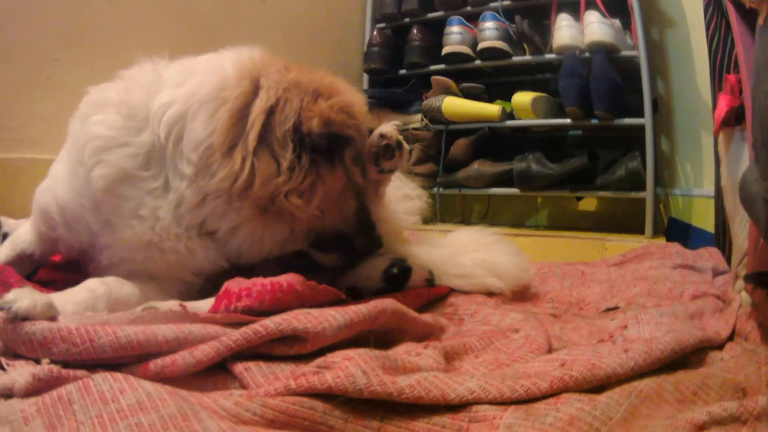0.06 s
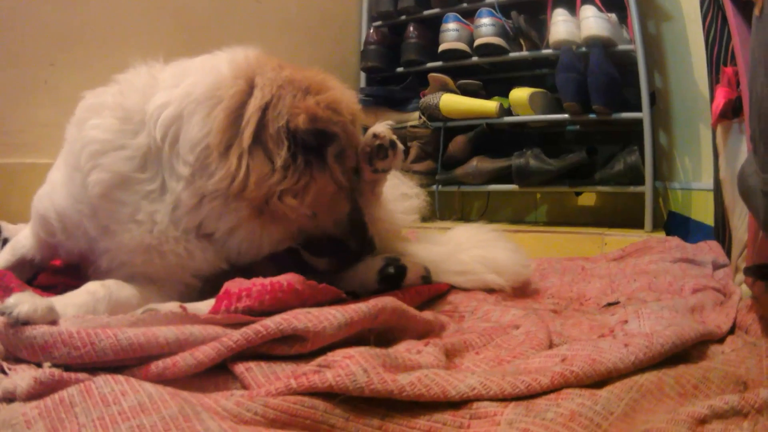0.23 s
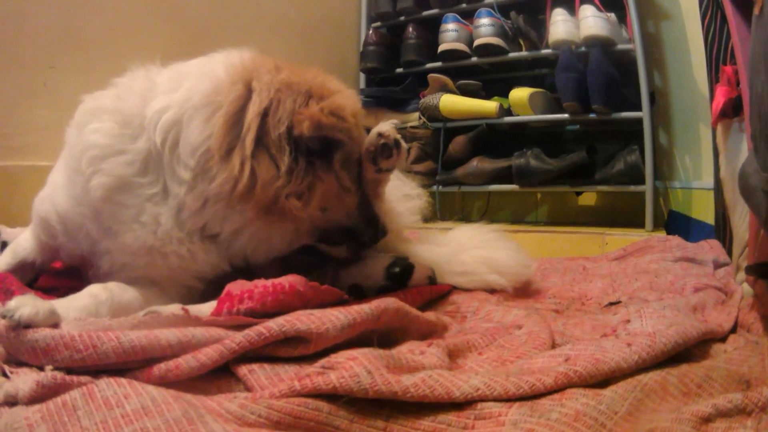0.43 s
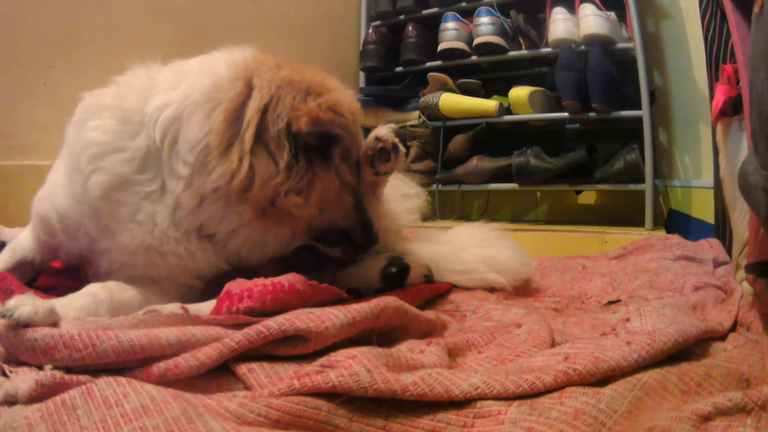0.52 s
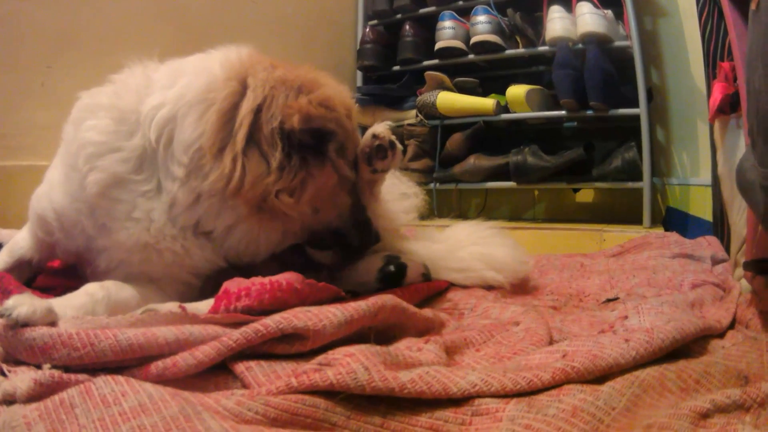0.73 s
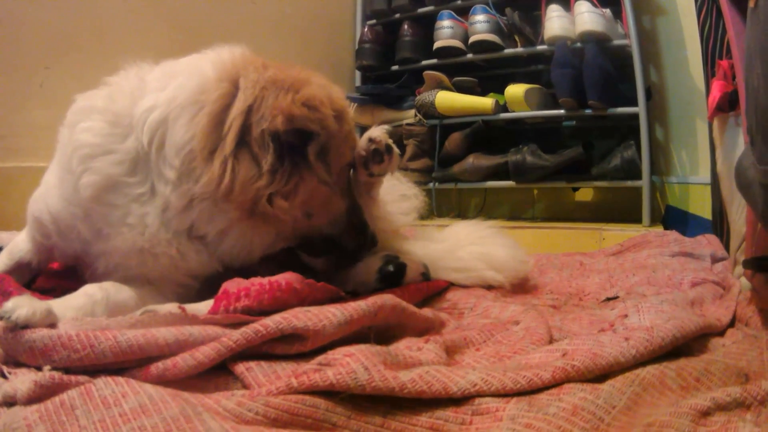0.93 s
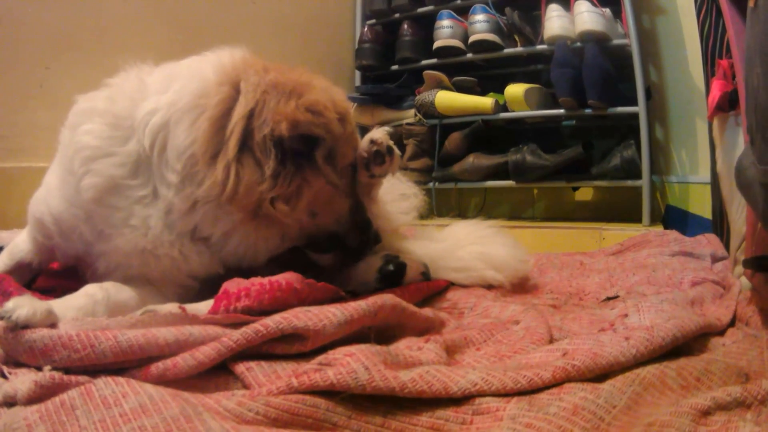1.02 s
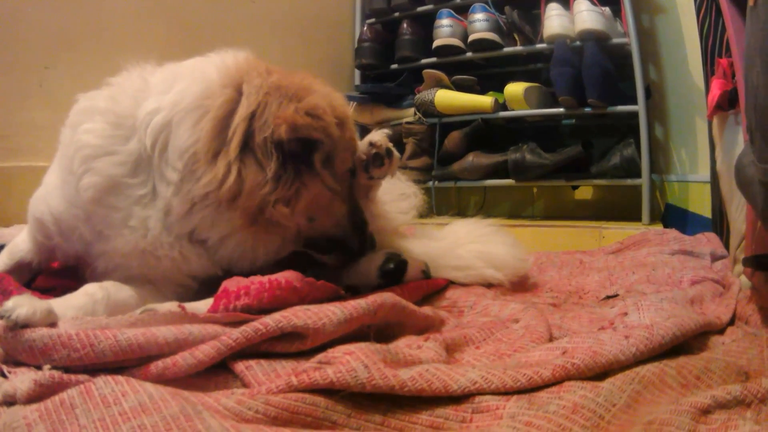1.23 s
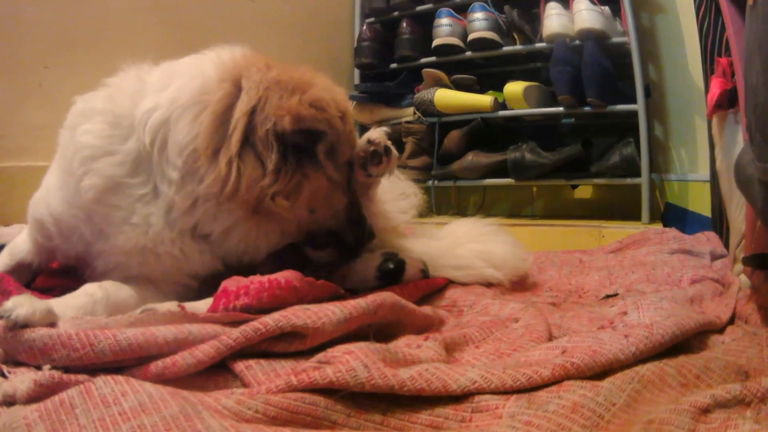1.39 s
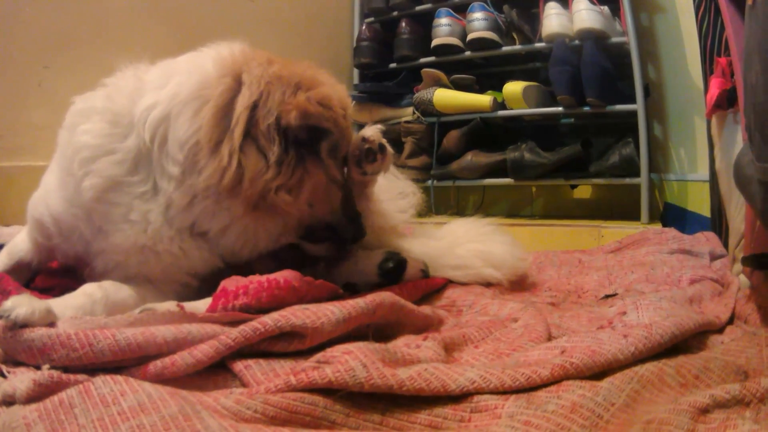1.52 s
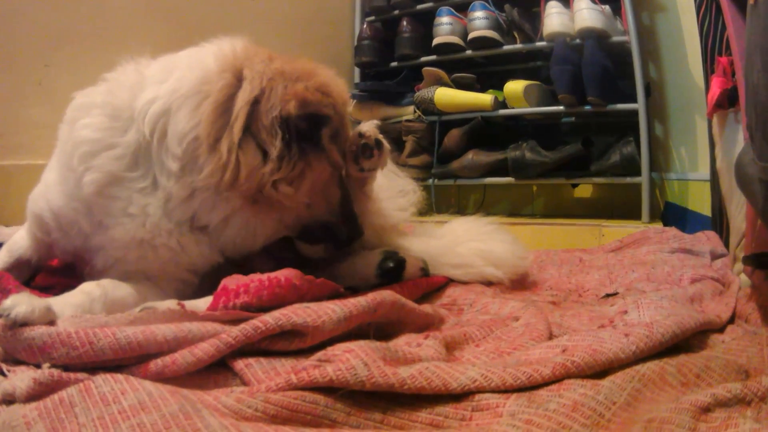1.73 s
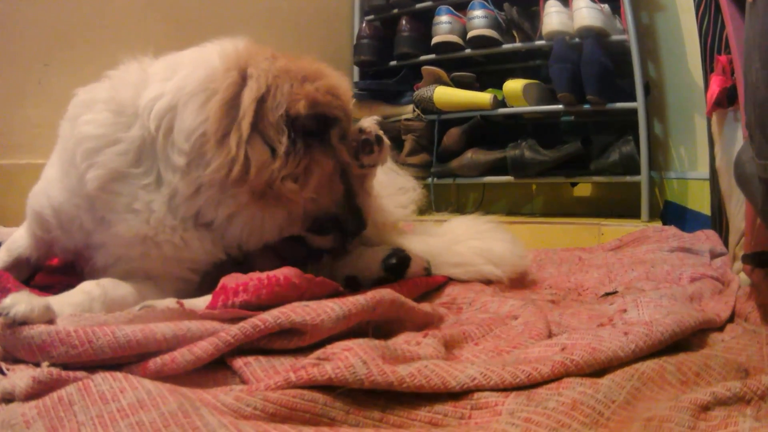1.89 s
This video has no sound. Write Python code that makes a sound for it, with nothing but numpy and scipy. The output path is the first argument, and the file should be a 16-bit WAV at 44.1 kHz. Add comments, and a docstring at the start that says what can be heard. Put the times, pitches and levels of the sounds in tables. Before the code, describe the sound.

Close, wet licking from a dog indoors: a few saliva bubbles come first, then five evenly spaced hollow smacks with soft mouth knocks and crackles. They thin out to a low rustle of fur and steady room noise.

```python
"""A dog lying on blankets licks itself five times, close by, in a quiet room.
It opens on a few saliva bubbles and a faint brush of tongue on fur, over steady room noise.
From 0.24 s the licks come about 0.36 s apart. Each starts with a hollow pop as the tongue pulls
free; wet crackle, soft mouth knocks, small bubbles and a dull shudder of the jaw follow.
After the last pop, at 1.69 s, the wet sounds thin out to a low rustle and the room noise."""
import sys
import numpy as np
from scipy import signal
from scipy.fft import rfft, irfft
from scipy.io import wavfile
from scipy.ndimage import uniform_filter1d

SR = 44100
rng = np.random.default_rng(int(sys.argv[2]) if len(sys.argv) > 2 else 0)


def to_wav(s):
    """Save 16-bit WAV."""
    ch = np.atleast_2d(s).T  # columns
    pcm = np.round(np.clip(ch, -1, 1) * 32767)  # PCM
    wavfile.write(sys.argv[1], SR, pcm.astype(np.int16))


N = 85995

# One pop per lick: (time [s], upper mode gain [dB], upper mode t60 [s], lower mode gain [dB],
# snap gain [dB], attack [s])
TONGUE_POPS = [(0.2396, 19, .013, -4.5, -34.5, 0.0041), (0.6117, 18.5, 0.0093, -0.6, -38.5, .0044),
               (0.9446, 21.5, 0.0065, -4, -38, .0043), (1.3132, 15, .0097, -11, -48.5, 0.0048),
               (1.6871, 24, 0.0067, -3, -37, .0043)]
# EQ that makes the pop hollow: (frequency [Hz], gain [dB])
HOLLOW_EQ = [(50, -15), (150, -12), (240, -1.5), (500, 0), (900, -2.5), (2000, -7)]
UPPER_HZ, LOWER_HZ, LOWER_T60_S = 410, 315.8, 0.029
SNAP_DELAY_S, SNAP_WIDTH_S = 0.0027, 0.0028
def tongue_pops():
    """The tongue pulls free: two modes of the mouth ring, with a tiny wet snap on top."""
    hollow, snaps = np.zeros((2, N))
    for time, upper_db, upper_t60, lower_db, snap_db, attack in TONGUE_POPS:
        upper = amp(upper_db) * ring(UPPER_HZ, attack, upper_t60)
        lower = amp(lower_db) * ring(LOWER_HZ, attack, LOWER_T60_S)
        add(hollow, time, upper + lower)
        lead, snap = wet_burst(SNAP_WIDTH_S)
        add(snaps, time + SNAP_DELAY_S - lead, amp(snap_db) * snap)
    return colour(hollow, HOLLOW_EQ) + snaps


# Soft knocks of tongue and lips: (time [s], gain [dB], pitch [Hz])
MOUTH_KNOCKS = [(.272, -17, 426), (0.295, -21.5, 330), (.305, -21.5, 330), (0.541, -31.5, 403),
                (0.649, -25.5, 287), (0.674, -26, 474), (0.8445, -23.5, 300), (0.986, -21, 308),
                (1.019, -24, 322), (1.355, -28, 310), (1.39, -26.5, 348), (1.67, -23.5, 500),
                (1.719, -19, 330)]
def mouth_knocks():
    """Dull, quickly damped knocks as the mouth closes."""
    out = np.zeros(N)
    for time, db, hz in MOUTH_KNOCKS:
        add(out, time, amp(db) * ring(hz, attack_s=0.0011, t60_s=0.02))
    return out


# Bubble pings: (time [s], gain [dB], starting pitch [Hz], t60 [s])
SALIVA_BUBBLES = [(.027, -19, 915, 0.022), (0.134, -26.5, 1120, 0.028), (.135, -20.5, 1647, 0.013),
                  (0.151, -31.5, 1180, 0.034), (.313, -29, 783, 0.027), (0.367, -31, 886, 0.041),
                  (.397, -20, 893, 0.022), (0.6447, -23, 2004, .012), (.676, -15, 736, 0.011),
                  (.731, -28, 913, 0.033), (.762, -24, 947, 0.019), (.981, -44, 2170, 0.018),
                  (.981, -33.5, 3597, 0.029), (1.022, -23.5, 774, 0.024), (1.081, -21, 873, 0.03),
                  (1.094, -30.5, 926, 0.036), (1.273, -43.5, 808, 0.1), (1.356, -32.5, 2750, 0.019),
                  (1.453, -34.5, 840, 0.038), (1.48, -21.5, 944, 0.017), (1.4997, -27, 2790, 0.015),
                  (1.818, -25, 849, 0.036)]
def saliva_bubbles():
    """Small bubbles ping, each bending slightly up in pitch."""
    out = np.zeros(N)
    for time, db, hz, t60 in SALIVA_BUBBLES:
        add(out, time, amp(db) * ring(hz, attack_s=0.0019, t60_s=t60, glide_per_s=0.77))
    return out


# Wet crackles: (centre time [s], level [dB], half-width [s], resonance [Hz])
FILM_CRACKLES = [(0.062, -48.5, 0.0036, 1310), (.139, -48, .003, 2180), (.153, -52, 0.0046, 2300),
                 (0.273, -49, 0.0083, 2225), (0.276, -49.5, 0.0098, 3600), (.408, -49, 0.016, 1040),
                 (0.545, -52, 0.0051, 1960), (0.6463, -45.5, 0.0033, 3300), (.652, -45.5, 0.0032, 2070),
                 (.712, -53, 0.0092, 3280), (.768, -57, 0.0047, 5870), (0.8, -55.5, .005, 2500),
                 (.984, -42, 0.0037, 2150), (.986, -51.5, 0.0044, 3490), (1.351, -55.5, 0.0043, 5900),
                 (1.359, -42, 0.0028, 2230), (1.357, -44.5, 0.0037, 3200), (1.422, -54, 0.0051, 2480),
                 (1.474, -42.5, 0.0083, 972), (1.7224, -39, 0.0013, 2500), (1.73, -45, .003, 1300),
                 (1.857, -58.5, 0.0091, 3100)]
def saliva_crackles():
    """The saliva film tears in short, resonant clumps of clicks."""
    out = np.zeros(N)
    for time, db, width, hz in FILM_CRACKLES:
        lead, crackle = wet_burst(width, hz)
        add(out, time - lead, amp(db) * crackle)
    return out


# EQ that makes clicks sound wet: (frequency [Hz], gain [dB])
WET_EQ = [(200, -21), (700, 2), (1200, 2), (1680, -10), (2100, -1.5), (2500, -3.5), (3000, 2), (3500, -8),
          (4300, -9.5), (6000, -12), (7500, -26)]
RESONANCE_WIDTH_HZ, RESONANCE_DB = 400, 5
def wet_burst(width_s, ring_hz=None):
    """A clump of wet clicks that may excite one resonance. Returns (time to its centre, sound)."""
    t = np.arange(SR // 10) / SR
    centre = t.mean()
    envelope = np.exp(-abs(t - centre) / width_s)
    clump = colour(clicks(per_s=2500, spread_db=1, size=len(t)) * envelope, WET_EQ)
    if ring_hz:
        resonator = signal.iirpeak(ring_hz, ring_hz / RESONANCE_WIDTH_HZ, SR)
        clump = unit(clump) + amp(RESONANCE_DB) * unit(signal.lfilter(*resonator, clump))
    return centre, clump * np.linalg.norm(envelope) / (np.linalg.norm(clump) + 1e-12)


# Low shudders under the licks: (time [s], gain [dB])
JAW_SETTLES = [(0.269, -37.5), (0.645, -35.5), (0.983, -43), (1.352, -49), (1.717, -36)]
# Their dark, fleshy tone: (frequency [Hz], gain [dB])
FLESH_EQ = [(40, -17), (90, -9), (145, 7.5), (210, -13.5), (290, -4.5), (420, -12.5), (600, -4),
            (1200, -30), (3000, -42)]
SETTLE_ATTACK_S, SETTLE_T60_S = 0.011, 0.2
def jaw_settles():
    """Jaw and muzzle settle with a dull shudder just after each pop."""
    out = np.zeros(N)
    t = np.arange(SR // 4) / SR
    envelope = (1 - np.exp(-t / SETTLE_ATTACK_S)) * decay(t, SETTLE_T60_S)
    for time, db in JAW_SETTLES:
        add(out, time, amp(db) * envelope * noise(len(t), FLESH_EQ))
    return out


# Fader moves of the tongue on fur: (time [s], level [dB])
BRUSH_FADER = [(0, -50), (.09, -51), (.2, -57), (.29, -50), (.47, -61), (.57, -52.5), (.69, -52),
               (.78, -56.5), (.9, -56.5), (1.0, -52.5), (1.07, -48.5), (1.14, -56.5), (1.25, -61.5),
               (1.38, -57), (1.49, -60.5), (1.57, -60.5), (1.72, -51.5), (1.8, -62.5), (1.95, -59.5)]
# Its soft, bristly tone: (frequency [Hz], gain [dB])
FUR_EQ = [(100, -23.5), (300, 4.5), (560, -5), (730, -4.5), (900, 1.5), (1040, -3.5), (1150, 3),
          (1350, -1.5), (1600, -10), (2100, -7), (2600, -9), (3150, -11.5), (3900, -17), (7000, -25)]
def tongue_brush():
    """The tongue moves over fur in dense, fine grains."""
    grains = clicks(per_s=4800, spread_db=0.5, size=N)
    return unit(colour(grains, FUR_EQ)) * fader(BRUSH_FADER)


# Fader moves of the muzzle on the coat: (time [s], level [dB])
RUB_FADER = [(0, -45.5), (.08, -49), (.2, -52.5), (.33, -49), (.42, -52), (.52, -54.5), (.6, -52),
             (.72, -54.5), (.86, -53), (.93, -59), (1.02, -45.5), (1.12, -49.5), (1.2, -57), (1.42, -59),
             (1.55, -70), (1.63, -49), (1.76, -51.5), (1.95, -54.5)]
# Its muffled tone: (frequency [Hz], gain [dB])
COAT_EQ = [(60, -22.5), (160, -9), (285, 4), (400, -4), (520, -4), (700, -19), (2000, -51.5)]
def muzzle_rub():
    """The muzzle rubs the coat with a low rustle."""
    return noise(N, COAT_EQ) * fader(RUB_FADER)


# Early reflections off floor and wall: (delay [s], gain [dB])
NEAR_ECHOES = [(.0066, -19), (.0102, -13)]
def with_reflections(x):
    """Adds the near reflections that roughen small, high sounds."""
    out = x.copy()
    for delay, db in NEAR_ECHOES:
        add(out, delay, amp(db) * x)
    return out


# EQ on the reverb tail: (frequency [Hz], gain [dB])
REVERB_EQ = [(60, 14), (150, -11), (300, -0.5), (450, -10), (900, -1), (2000, -2.5), (3500, 1),
             (7000, -10.5)]
REVERB_SEND_DB, REVERB_T60_S, PREDELAY_S = -11, 0.12, 0.008
def room_reverb(x):
    """A short, soft tail from a small furnished room."""
    t = np.arange(SR // 2) / SR
    tail = rng.standard_normal(len(t)) * decay(t, REVERB_T60_S) * (t > PREDELAY_S)
    response = colour(tail / np.linalg.norm(tail), REVERB_EQ)
    return amp(REVERB_SEND_DB) * signal.fftconvolve(x, response)[:N]


# Spectrum of the room noise: (frequency [Hz], gain [dB])
ROOM_TONE_EQ = [(20, 0), (50, -8.5), (110, 0.5), (250, -4), (450, -9), (700, -14), (900, -11),
                (1250, -18.5), (1700, -14.5), (2400, -30.5), (3000, -34.5), (3800, -29), (5200, -24),
                (6800, -25), (7600, -40)]
ROOM_TONE_DB = -55
def room_tone():
    """A steady, dark bed of room noise."""
    return amp(ROOM_TONE_DB) * noise(N, ROOM_TONE_EQ)


PATCH_DB, PATCH_S, PATCH_HZ = 3.5, 0.035, 350
def patchy(x):
    """Lets the level drift at random in small patches of time and frequency."""
    frame, hop = 512, 128
    spectrum = signal.stft(x, nperseg=frame, noverlap=frame - hop)[2]
    drift = rng.standard_normal(spectrum.shape)
    drift = uniform_filter1d(drift, round(PATCH_HZ * frame / SR), axis=0)
    drift = uniform_filter1d(drift, round(PATCH_S * SR / hop), axis=1)
    spectrum *= amp(PATCH_DB * unit(drift))
    return signal.istft(spectrum, nperseg=frame, noverlap=frame - hop)[1][:N]


def ring(hz, attack_s, t60_s, glide_per_s=0):
    """A pocket of air that swells briefly and rings out."""
    t = np.arange(SR // 10) / SR
    envelope = (1 - np.exp(-(t / attack_s) ** 2)) * decay(t, t60_s)
    return -envelope * np.sin(2 * np.pi * hz * (t + glide_per_s * t ** 2 / 2))


def clicks(per_s, spread_db, size):
    """Random clicks of uneven strength."""
    strength = amp(spread_db * np.minimum(rng.exponential(1, size), 4))
    return strength * rng.choice([-1., 1.], size) * (rng.random(size) < per_s / SR)


def noise(size, eq):
    """Coloured noise at rms 1."""
    return unit(colour(rng.standard_normal(size), eq))


def colour(x, eq):
    """Filters by a (frequency [Hz], gain [dB]) curve."""
    hz, db = np.transpose(eq)
    size = 2 * len(x)
    bins_hz = np.fft.rfftfreq(size, 1 / SR)
    gain = amp(np.interp(np.log(bins_hz + 1), np.log(hz), db))
    return irfft(rfft(x, size) * gain, size)[:len(x)]


def fader(points):
    """Gain along a (time [s], level [dB]) curve."""
    return amp(np.interp(np.arange(N) / SR, *np.transpose(points)))


def decay(t, t60_s):
    """Falls by 60 dB in t60_s."""
    return np.exp(-np.log(1000) * t / t60_s)


def amp(db):
    """Decibels to gain."""
    return 10 ** (np.asarray(db) / 20)


def unit(x):
    """Scales to rms 1."""
    return x / np.sqrt(np.mean(x ** 2) + 1e-20)


def add(mix, time, sound):
    """Mixes a sound in at a time in seconds."""
    part = mix[max(round(time * SR), 0):][:len(sound)]
    part += sound[:len(part)]


def scene():
    """Mono mix: the mouth up front with a little reverb, fur and room tone behind."""
    mouth = tongue_pops() + mouth_knocks() + jaw_settles()
    mouth += with_reflections(saliva_bubbles() + saliva_crackles())
    bed = room_tone()
    reverb = room_reverb(mouth)
    background = patchy(tongue_brush() + muzzle_rub() + bed)
    return (mouth + reverb + background)[None]


HIGH_CUT_HZ = 7400
def record(dry):
    """A steep high cut on the whole mix."""
    lowpass = signal.firwin(401, HIGH_CUT_HZ, window=("kaiser", 8), fs=SR)
    return signal.oaconvolve(dry, lowpass[None], "same")


dry = scene()
out = record(dry)
to_wav(out)
```